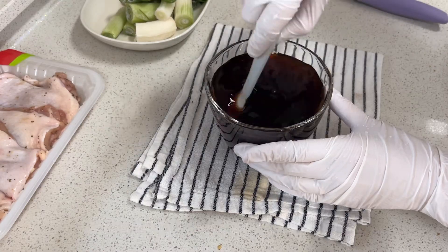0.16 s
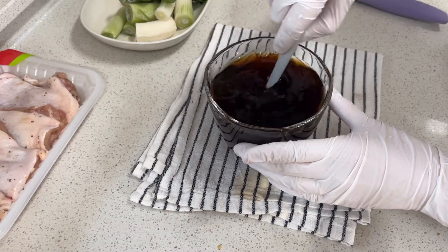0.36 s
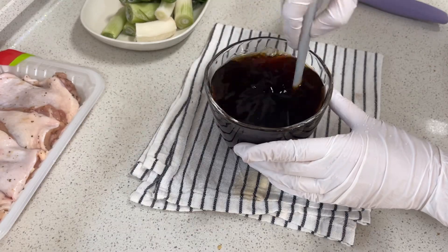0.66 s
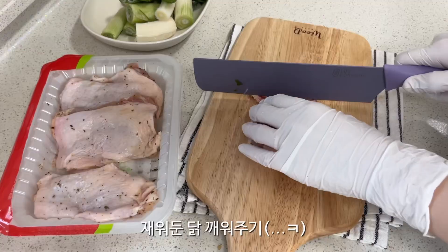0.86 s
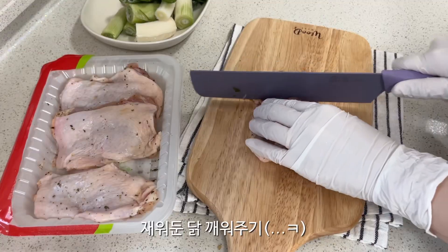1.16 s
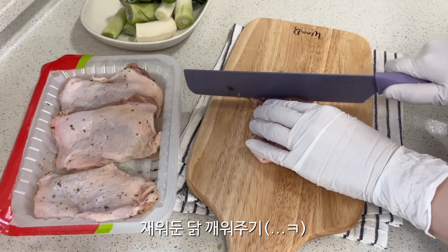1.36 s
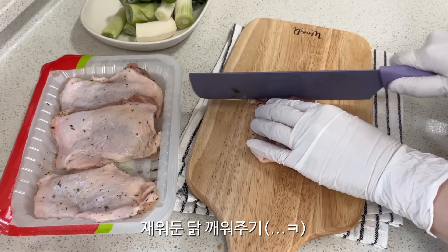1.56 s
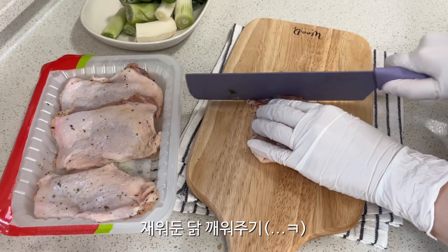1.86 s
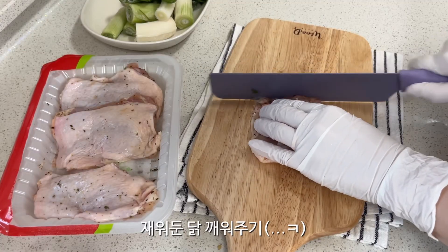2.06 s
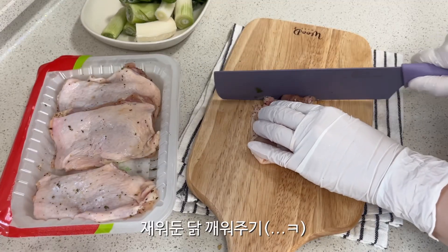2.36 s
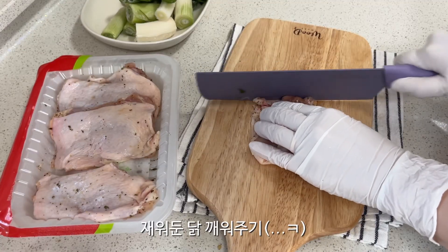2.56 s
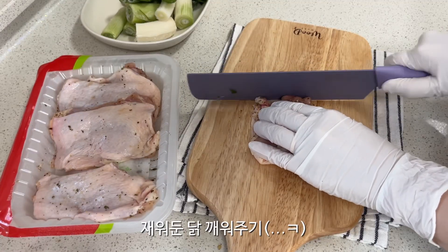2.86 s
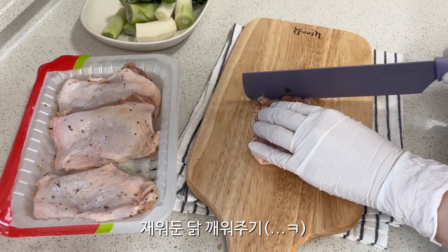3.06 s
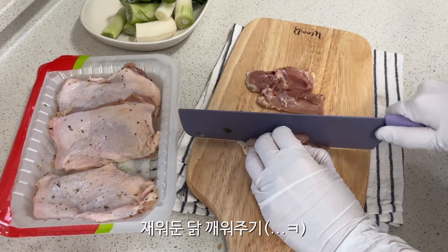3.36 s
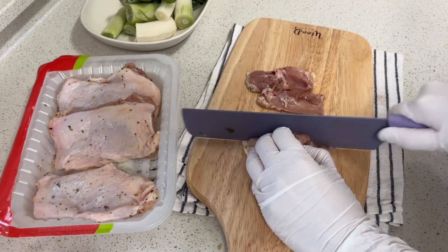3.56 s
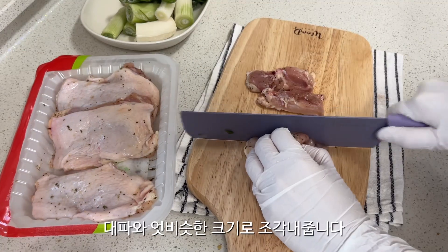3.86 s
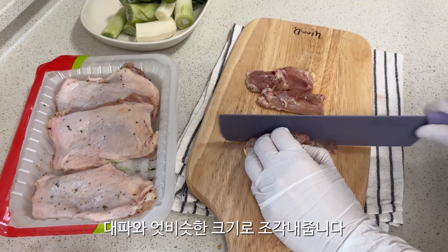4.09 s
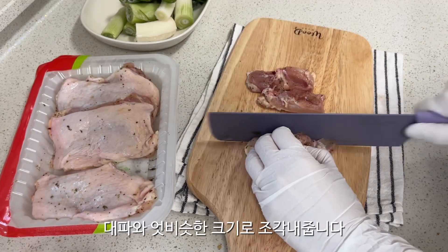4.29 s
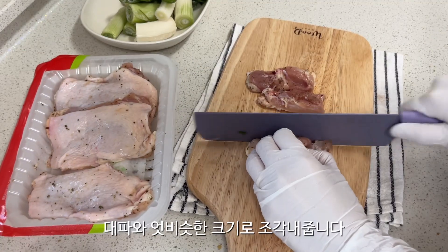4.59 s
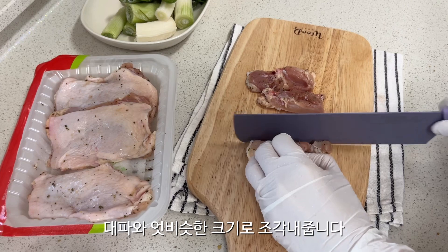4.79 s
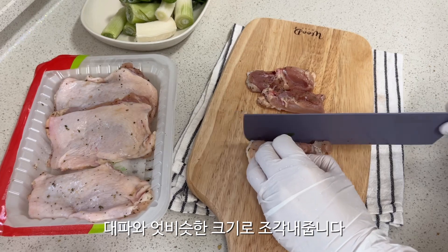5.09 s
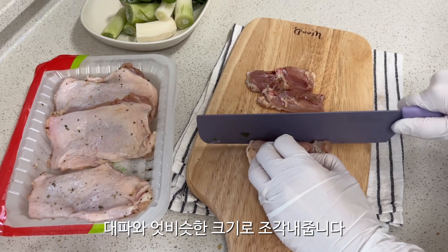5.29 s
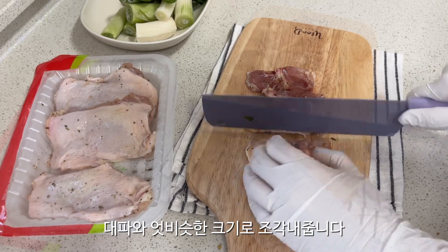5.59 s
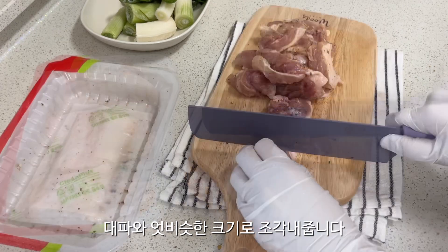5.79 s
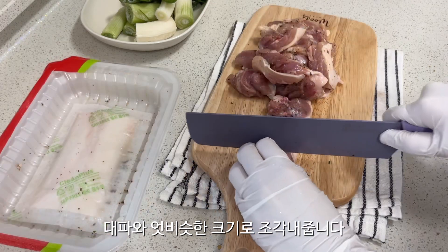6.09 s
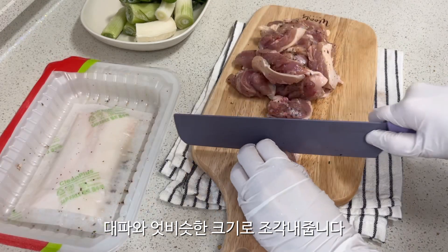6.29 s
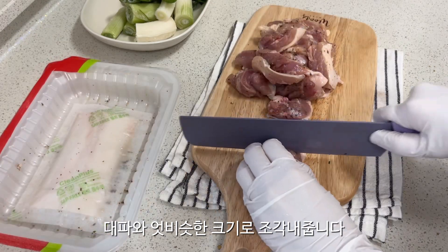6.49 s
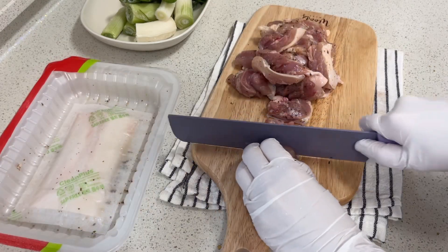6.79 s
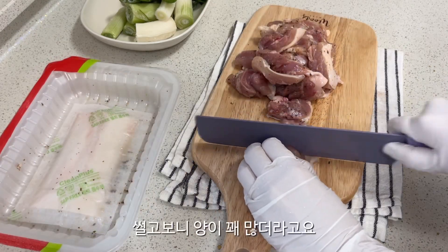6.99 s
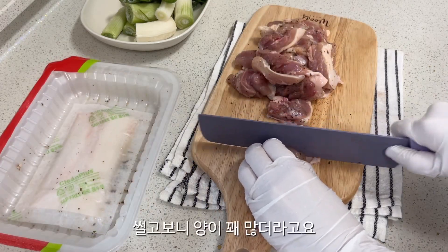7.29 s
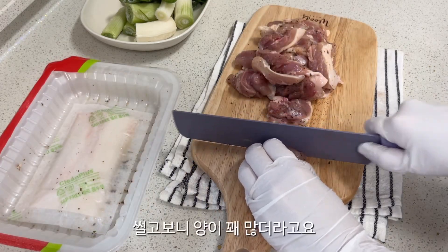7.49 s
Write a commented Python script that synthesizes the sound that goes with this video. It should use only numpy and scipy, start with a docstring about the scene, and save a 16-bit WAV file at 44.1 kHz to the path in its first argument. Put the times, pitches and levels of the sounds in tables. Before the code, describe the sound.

A spoon scrapes and clinks in a glass bowl, then a knife rasps through raw wet meat with woody knocks, over a faint appliance drone.

```python
"""An appliance drones in a small kitchen, over soft room air and a low rumble.
Close to the microphones a spoon stirs sauce in a glass bowl: grainy scraping swirls and ringing clinks.
Then a knife saws through raw meat on a wooden board. Each stroke tears countless fibres: random grains
make a rasp that swells with the blade's speed, a hiss at its edge and a grumble in the board.
Wet meat ticks and squelches in noise bursts, and the blade knocks on the ringing wood."""
import sys
import numpy as np
from scipy import signal
from scipy.fft import rfft, irfft, next_fast_len
from scipy.io import wavfile
from scipy.ndimage import uniform_filter1d, map_coordinates

SR = 44100
rng = np.random.default_rng(int(sys.argv[2]) if len(sys.argv) > 2 else 0)


def file_out(sig):
    """Save sig as 16-bit WAV at sys.argv[1]."""
    # one column per channel
    cols = np.atleast_2d(sig).T
    # limit, then scale
    lim = np.clip(cols, -1, 1)
    pcm = np.round(lim * 32767).astype(np.int16)
    wavfile.write(sys.argv[1], SR, pcm)


N = 337365
TIME = np.arange(N) / SR

# where the rasp takes on the colour of the second and the third piece of meat: time [s]
PIECE_STARTS = [3.165, 5.7]
# modes of the wooden board: (frequency [Hz], relative level [dB], t60 [s])
BOARD_MODES = [(509, 1, 0.11), (770, -9.5, 0.08), (851, -14, 0.12), (952, -23, 0.12), (1107, -24, 0.07),
               (1294, -19, 0.09), (1473, -22.5, 0.14), (1810, -18, 0.21), (1954, -20, 0.22),
               (2224, -29.5, 0.29), (3400, -41, .05)]
# colour of squeezed wet meat: (frequency [Hz], relative level [dB per Hz])
SQUISH_COLOUR = [(500, 3), (1500, -4.5), (3300, 3), (6000, -4.5), (11000, -10), (16000, -13)]


def amp(db):
    """Decibels to gain."""
    return 10 ** (np.asarray(db) / 20)


def unit(x):
    """Scale to rms 1."""
    return x / np.sqrt(np.mean(x ** 2) + 1e-20)


def along(points, hz):
    """Read (Hz, value) points on a log axis."""
    f, v = np.transpose(points)
    return np.interp(np.log(hz + 1), np.log(f + 1), v)


def level(rows):
    """Gain per sample from (s, dB) rows."""
    return amp(np.interp(TIME, *np.transpose(rows)))


def wobble(rate):
    """A smooth random curve, rate knots a second."""
    knots = rng.standard_normal(int(N * rate / SR) + 4)
    return map_coordinates(knots, [TIME * rate])


def filtered(x, response):
    """x times a complex response of frequency."""
    m = next_fast_len(N + SR // 2)
    spectrum = rfft(x, m) * response(np.fft.rfftfreq(m, 1 / SR))
    return irfft(spectrum, m)[..., :N]


def coloured(x, spectrum, size=8192):
    """Pass x through a causal filter with the given (Hz, dB) shape."""
    cepstrum = irfft(np.log(amp(along(spectrum, np.fft.rfftfreq(size, 1 / SR)))))
    # folding the cepstrum forward gives minimum phase
    cepstrum[1:size // 2] *= 2
    cepstrum[size // 2 + 1:] = 0
    impulse = irfft(np.exp(rfft(cepstrum)))
    return signal.fftconvolve(x, impulse)[:len(x)]


def add(track, s, sound):
    """Mix a sound into the track at s seconds."""
    part = track[round(s * SR):][:len(sound)]
    part += sound[:len(part)]


def fade(t60):
    """Half a second of exponential decay."""
    return np.exp(-np.log(1000) * TIME[:SR // 2] / t60)


def burst(spectrum, t60, attack):
    """A short coloured crack of noise, of peak 1; t60 and attack in seconds."""
    rise = 1 - np.exp(-TIME[:SR // 2] / attack)
    noise = rng.standard_normal(SR // 2) * rise * fade(t60)
    crack = coloured(noise, spectrum)
    return crack / np.abs(crack).max()


def ring(modes):
    """Struck modes decay as sines, at slightly new strengths for every blow."""
    t = TIME[:SR // 2]
    return sum(amp(db + rng.standard_normal()) * fade(t60) * np.sin(2 * np.pi * hz * t)
               for hz, db, t60 in modes)


def grains(rate, spread_db):
    """Random tiny impulses, rate a second, with uneven sizes; the whole has rms 1."""
    sizes = amp(spread_db * np.clip(rng.standard_normal(N), -2, 2)) * rng.choice([-1, 1], N)
    hits = rng.random(N) < rate / SR
    # denser grains are made smaller, so that their power holds steady
    return unit(sizes * hits / np.sqrt(rate))


def swell(start, length, peak_share):
    """Half a sine from rest to rest, highest peak_share of the way through."""
    peak = start + length * np.clip(peak_share, .1, .9)
    turn = np.interp(TIME, [start, peak, start + length], [0, .5, 1])
    return np.abs(np.sin(np.pi * turn))


def background(speed):
    """An appliance drones and whines over room air and a low rumble that grows as strokes rock the worktop."""
    # low rumble of worktop and room: (time [s], level [dB] before the gains below)
    rumble_level = [(0.15, -57.5), (2.42, -60.5), (3.92, -52.5), (5.84, -54), (5.92, -60.5), (7.55, -53.5)]
    # its colour: (frequency [Hz], relative level [dB per Hz])
    rumble_colour = [(18, -49), (28, -28), (40, -6), (54, 2.5), (70, -10), (100, -12.5), (160, -31),
                     (400, -54.5)]
    # soft room air: (frequency [Hz], relative level [dB per Hz])
    air_colour = [(50, -8), (100, 0), (165, -2.5), (220, -6), (330, -7.5), (500, -16), (1000, -25.5),
                  (2000, -39.5), (5000, -40.5), (10000, -41), (16000, -52)]
    # the appliance's hum and thin whine: (frequency [Hz], rms level [dB])
    drone_tones = [(54.5, -64.5), (160, -76), (14718, -88)]
    rest_db, rocking_db = -2, 3.5  # gain with the blade at rest; more at its full speed
    sway_db = 2  # the rumble rises and falls by chance

    rumble_gain = amp(rest_db + rocking_db * speed + sway_db * wobble(7)) * level(rumble_level)
    rumble = rumble_gain * unit(coloured(rng.standard_normal(N), rumble_colour))
    # each tone's phase wanders a little
    drone = sum(amp(db) * unit(np.sin(2 * np.pi * hz * TIME + 0.58 * wobble(6.9)))
                for hz, db in drone_tones)
    air = unit(coloured(rng.standard_normal(N), air_colour))
    width = unit(coloured(rng.standard_normal(N), air_colour))
    # opposite signs left and right spread the air
    return rumble + drone + amp(-65) * air + amp(-73.5) * np.array([width, -width])


def stirring():
    """The spoon grazes the glass in uneven swirls and now and then strikes it, ringing bowl and spoon."""
    # swirls round the bowl, each swelling and fading: (start [s], length [s], level [dB])
    swirls = [(0.128, 0.27, -71), (0.36, 0.2, -75.5), (.56, 0.092, -68), (0.721, 0.035, -64)]
    # the glass under the sliding spoon: (frequency [Hz], relative level [dB per Hz])
    scrape_colour = [(700, -21), (1120, 2), (1400, -8.5), (2100, 3.5), (2400, -13), (2750, -4), (3600, -13),
                     (4500, -8), (4900, 1.5), (5500, -11), (6300, -15), (7600, -4.5), (9500, -23),
                     (16000, -25)]
    # the spoon hits the bowl: (time [s], glass [dB], spoon [dB], click [dB] before its gain below)
    clinks = [(0.1388, -51.5, -59, -43), (.2, -65, -78, -62), (0.234, -68, -79, -45),
              (0.2514, -58, -47.5, -37), (0.7301, -84, -85, -49), (.739, -88, -86, -61)]
    # modes of the glass bowl: (frequency [Hz], relative level [dB], t60 [s])
    glass_modes = [(1137, -11.5, 0.17), (2070, -8, 0.075), (2770, -1.5, 0.13), (3500, 2, 0.027),
                   (5020, -12, 0.13), (7200, -31, .1)]
    # modes of the spoon: (frequency [Hz], relative level [dB], t60 [s])
    spoon_modes = [(2340, -18, 0.034), (2505, 5.5, 0.062), (2570, -7, 0.095), (3000, -17, 0.049)]
    # hard tap on glass: (frequency [Hz], relative level [dB per Hz])
    tap_colour = [(500, -24), (1200, -9.5), (2100, 0), (3200, -1), (5000, -5), (7600, -0.5), (10000, -16),
                  (16000, -14)]
    swirl_sharpness = 1.2  # above 1 narrows each swell

    graze = unit(coloured(grains(1200, spread_db=3.0), scrape_colour)) * amp(3.0 * wobble(31.0))
    bowl = graze * sum(amp(db) * swell(start, length, .5) ** swirl_sharpness
                       for start, length, db in swirls)
    for s, glass_db, spoon_db, click_db in clinks:
        add(bowl, s, amp(glass_db) * ring(glass_modes) + amp(spoon_db) * ring(spoon_modes))
        add(bowl, s, amp(click_db + 2.5) * burst(tap_colour, t60=0.0063, attack=0.00035))
    return bowl


def smacks(count, centre_hz, cycles):
    """Tiny wet pops at random times, each ringing a few cycles at its own pitch."""
    when, pitch, size = rng.random(count), rng.standard_normal(count), rng.exponential(size=count)
    turns = centre_hz * np.exp(.38 * pitch[:, None]) * TIME[:SR // 80]
    sizes = amp(2.6 * np.minimum(size, 3))[:, None]
    pops = sizes * np.sin(2 * np.pi * turns) * np.exp(-turns / cycles)
    places = (when * N).astype(int)[:, None] + np.arange(SR // 80)
    return unit(np.bincount(places.ravel(), pops.ravel(), N)[:N])


def wet_meat():
    """Moist films part under glove and blade: ticks and squelches over small smacks and a faint crackle."""
    # the fingers hold and shift the meat: (start [s], end [s], level [dB])
    handling = [(.98, 5.4, -73.5), (5.98, 9.3, -82)]
    # the meat squelches under the glove: (time [s], peak level [dB])
    squelches = [(1.0064, -48), (1.0952, -53), (1.161, -58.5), (1.3217, -55.5), (5.8022, -49),
                 (6.0202, -57.5), (6.7816, -46), (6.915, -44)]
    # wet films snap: (time [s], level [dB] before the gains below)
    ticks = [(1.425, -39), (1.661, -45), (1.936, -47), (2.218, -44.5), (3.5718, -51), (4.789, -51),
             (5.4824, -45.5), (5.5609, -46.5), (5.8475, -41.5), (5.874, -42.5), (6.0916, -50.5),
             (6.344, -51), (6.7213, -45), (6.7493, -35), (6.915, -33.5)]
    # snap of a film: (frequency [Hz], relative level [dB per Hz])
    snap_colour = [(2000, -30), (6000, -3.5), (9000, 0), (16000, 0)]
    grip_s = 0.022  # the hand takes hold and lets go
    tick_body_db = -10.5  # the soft body under a snap

    crackle = unit(coloured(grains(900, spread_db=11.0), SQUISH_COLOUR))
    clumps = amp(5.3 * wobble(22))
    grip = sum(amp(db) * np.clip(np.minimum(TIME - start, end - TIME) / grip_s, 0, 1)
               for start, end, db in handling)
    pops = smacks(count=900, centre_hz=2670, cycles=3.3)
    meat = grip * unit(clumps * (pops + 1.8 * crackle))
    for s, db in ticks:
        snap = amp(2) * burst(snap_colour, t60=.005, attack=.0001)
        body = amp(tick_body_db) * burst(SQUISH_COLOUR, t60=0.015, attack=0.00017)
        add(meat, s, amp(db) * (snap + body))
    for s, db in squelches:
        add(meat, s, amp(db) * burst(SQUISH_COLOUR, t60=0.026, attack=0.00044))
    return meat


def knocks():
    """The blade breaks through gristle and lands on the board; the hand's weight adds dull bumps."""
    # the blade meets the board: (time [s], level [dB] before the gain below, meat in between [0-1])
    landings = [(1.035, -47, 0.8), (1.535, -35.5, 0.7), (1.964, -39.5, 1), (2.15, -34, 0.95),
                (2.279, -35.5, 0), (3.094, -33.5, 0.1), (3.114, -34.5, .2), (3.135, -37.5, 0.6),
                (3.321, -38, 0.05), (3.432, -44.5, 0), (3.472, -38, 0.07), (3.588, -30.5, 0.4),
                (3.712, -29, 0.03), (3.728, -29, 0.64), (4.884, -34.5, 0.5), (4.898, -31, .2),
                (5.046, -32, 0.35), (5.379, -43.5, 0), (5.681, -17, .01), (6.733, -40.5, 1),
                (6.752, -37.5, 0), (6.821, -36, 0), (6.975, -41, 0.85), (7.076, -26.5, 0.8),
                (7.082, -23.5, .55)]
    # dull thud of steel on wood: (frequency [Hz], relative level [dB per Hz])
    thud_colour = [(100, -28), (300, -12.5), (700, 0), (1400, -6.5), (2100, -9.5), (2800, -27.5),
                   (3500, -18.5), (4900, -30), (5800, -55), (16000, -61)]
    # the hand bears down, the board shifts on its towel: (time [s], level [dB] before the gain below)
    pushes = [(1.529, -65), (1.83, -50.5), (6.737, -47.5), (6.776, -56)]
    # dull bump of the board: (frequency [Hz], relative level [dB per Hz])
    bump_colour = [(50, -2), (110, 2.5), (220, -6.5), (380, -5), (800, -22), (3000, -65)]
    ring_db, meat_damping_db = -9, 19  # ring of the bare board; what a full cushion of meat takes off it

    wood = np.zeros(N)
    for s, db, meat in landings:
        meat = np.clip(meat, 0, 1)
        thud = burst(thud_colour, t60=0.043, attack=0.00063)
        crunch = meat * burst(SQUISH_COLOUR, t60=0.018, attack=.001)
        board_ring = amp(ring_db - meat_damping_db * meat) * ring(BOARD_MODES)
        add(wood, s, amp(db - 4.5) * (thud + board_ring + crunch))
    for s, db in pushes:
        add(wood, s, amp(db + 6.5) * burst(bump_colour, t60=0.23, attack=0.0066))
    return wood


def strokes():
    """Blade speed and the gains of drag, rasp and hiss: from the run of each stroke and its force."""
    # knife strokes, to and fro: (start [s], length [s] before overlap, force [dB])
    saw_strokes = [(1.406, 0.082, -65), (1.533, 0.074, -53), (1.665, 0.099, -64), (1.816, 0.081, -58),
                   (1.943, 0.1, -59.5), (2.064, 0.18, -54.5), (2.245, 0.11, -49.5), (2.363, .15, -47),
                   (2.52, .19, -44), (2.72, 0.18, -45), (2.904, 0.17, -43), (3.081, 0.078, -44.5),
                   (3.181, 0.073, -62.5), (3.298, 0.091, -56.5), (3.42, 0.071, -60), (3.517, 0.15, -53.5),
                   (3.665, 0.13, -46), (3.798, .12, -49.5), (3.932, 0.14, -43), (4.076, 0.14, -45),
                   (4.22, 0.16, -47), (4.378, 0.18, -44), (4.524, 0.23, -46), (4.782, .17, -49.5),
                   (4.963, 0.17, -50), (5.135, 0.17, -46.5), (5.355, 0.045, -61.5), (5.733, 0.16, -68.5),
                   (6.349, 0.11, -75.5), (6.456, 0.076, -66.5), (6.583, 0.12, -70), (6.733, 0.072, -54),
                   (6.84, 0.13, -57.5), (6.972, 0.15, -49.5), (7.121, 0.15, -52), (7.281, .15, -51),
                   (7.469, 0.24, -50.5)]
    # past the thick of each piece the edge drags less, and in the second and third it hisses more:
    # (through at [s], hiss gain [dB], drag loss [dB])
    breakthroughs = [(2.3, 0, 7), (3.75, 3.5, 5), (7.1, 4.5, 5.5)]
    fastest_share = 0.51  # how far into a stroke the blade runs fastest
    roundness = 0.8  # below 1 the blade reaches its speed early and holds it
    overlap_s = .005  # the meat keeps tearing while the blade turns round
    usual_force_db = -50
    # hiss at the usual force, before the mix in sawing(); its dB per dB of force
    hiss_db, hiss_slope = -62.5, 0.58
    # the grumble follows the force up to a limit, which drops once the blade is through;
    # both also stand before that mix
    drag_over_db, drag_limit_db = 2, -53.5

    speed, drag, rasp, hiss = np.zeros((4, N))
    for start, length, force_db in saw_strokes:
        run = swell(start - overlap_s, length + 2 * overlap_s, fastest_share) ** roundness
        through_s, gain_db, loss_db = breakthroughs[np.searchsorted(PIECE_STARTS, start)]
        through = start > through_s
        drag_db = min(force_db + drag_over_db, drag_limit_db - through * loss_db)
        edge_db = hiss_db + hiss_slope * (force_db - usual_force_db) + through * gain_db
        speed += run
        drag += amp(drag_db) * run
        rasp += amp(force_db) * run ** 1.36
        hiss += amp(edge_db) * run ** 1.58
    return speed, drag, rasp, hiss


def through_board(x, share):
    """Part of a vibration reaches the air directly, part sets the board's modes ringing."""
    ringing = unit(signal.fftconvolve(x, ring(BOARD_MODES))[:N])
    return unit(x + share * ringing)


def shifting(x, depth_db):
    """Resonances come and go as the contact point travels along the blade."""
    z = signal.stft(x, nperseg=1024)[2]

    def field(size):
        """Random gains smoothed over size frequency bins and nine frames."""
        over_bins = uniform_filter1d(rng.standard_normal(z.shape), size, axis=0)
        return unit(uniform_filter1d(over_bins, size=9, axis=1))

    gain = amp(depth_db * (field(size=2) + 0.79 * field(size=12)))
    return unit(signal.istft(z * gain, nperseg=1024)[1][:N])


def sawing(speed, drag, rasp, hiss):
    """The blade speeds up and stops in each stroke; the faster it runs, the denser the tearing."""
    # rasp of the three pieces of meat, each: (frequency [Hz], relative level [dB per Hz])
    first_piece = [(530, -26.5), (900, -4), (1330, 0.5), (1690, -8), (2150, 1), (2430, -12.5), (2640, -8),
                   (2870, -15.5), (3350, 0), (3500, -0.5), (3960, -13), (4370, -4.5), (4990, -18),
                   (5460, -17), (6500, -16), (8450, -58), (14300, -120)]
    second_piece = [(530, -40.5), (900, -4.5), (930, -6), (978, -1.5), (1130, -3.5), (1300, -1.5),
                    (1480, 1.5), (1790, -9.5), (2250, 2), (3090, -11), (3470, -2.5), (3860, -9),
                    (4790, -5.5), (5600, -15), (6500, -20), (8450, -68), (14300, -120)]
    third_piece = [(530, -38), (950, -11.5), (1280, 4), (1530, 2), (1740, -5.5), (2000, 1.5), (2400, -6),
                   (2750, -7.5), (3060, -0.5), (3700, -5), (5200, -8), (6500, -33), (8450, -46),
                   (14300, -120)]
    # hiss of the edge: (frequency [Hz], relative level [dB per Hz])
    hiss_colour = [(3000, -15), (5500, -0.5), (7500, 1.5), (9000, -1.5), (10500, 0.5), (11800, 3),
                   (13200, -4), (14400, -1), (16000, -4.5)]
    # what the board gives back under the dragging blade: (frequency [Hz], relative level [dB per Hz])
    drag_colour = [(120, -24), (250, -1.5), (400, -3), (520, 2), (650, 5), (950, 1), (1200, -8.5),
                   (1700, -29), (3000, -27)]

    # the edge catches and slips on sinew many times in a stroke
    catch = wobble(70)
    fibres = grains(900 + 5000 * speed, spread_db=2.5) * amp(2.0 * catch)
    body = shifting(through_board(fibres, share=.45), depth_db=2.6)
    piece = np.searchsorted(PIECE_STARTS, TIME)
    rasps = [unit(coloured(body, meat)) for meat in (first_piece, second_piece, third_piece)]
    tearing = np.choose(piece, rasps)

    fizz = shifting(grains(3000 + 9000 * speed, spread_db=3.0) * amp(1.2 * catch), depth_db=4.5)
    edge = unit(coloured(fizz, hiss_colour))

    slips = grains(300 + 700 * speed, spread_db=2.5) * amp(2.2 * catch)
    grumble = unit(coloured(through_board(slips, share=0.073), drag_colour))
    return amp(-2.5) * drag * grumble + amp(-0.5) * rasp * tearing + amp(5.0) * hiss * edge


def worktop(x, echo_db, count):
    """Nearby tray, bowl and wall send each microphone its own weak early echoes."""
    delays = (rng.uniform(.001, .012, (2, count)) * SR).astype(int)
    return np.array([x + amp(echo_db) * sum(np.pad(x, (d, 0))[:N] for d in side) for side in delays])


def kitchen(x):
    """The room's short answer: decaying noise, different at each microphone."""
    # how fast the small kitchen falls silent: (frequency [Hz], t60 [s])
    room_decay = [(200, 0.42), (1500, 0.3), (5000, 0.097), (14000, 0.06)]
    hz, t, z = signal.stft(rng.standard_normal((2, SR // 2)), SR, nperseg=256)
    decay = np.exp(-np.log(1000) * t / along(room_decay, hz)[:, None])
    tail = signal.istft(z * decay, SR, nperseg=256)[1]
    late = np.pad(x, (round(.004 * SR), 0))  # the room answers 4 ms late
    return signal.fftconvolve(late[None], tail / np.linalg.norm(tail[0]), axes=1)[:, :N]


def scene():
    """Everything happens on the worktop, close in front of the microphones."""
    speed, drag, rasp, hiss = strokes()
    bowl = stirring()
    cuts = sawing(speed, drag, rasp, hiss) + wet_meat()
    blows = knocks()
    room = kitchen(amp(-13.0) * bowl + amp(-14) * cuts + amp(-12.0) * blows)
    near = worktop(bowl + cuts + blows, echo_db=-15.5, count=5)
    return near + room + background(speed)


def record(dry):
    """Left and right differ in phase, most in the treble; nothing is kept above the band limit."""
    # phase by which the left channel leads the right: (frequency [Hz], phase [rad])
    left_lead = [(250, 0), (600, .3), (1000, 0), (1810, -.4), (3100, .7), (4200, .7), (5200, -.1),
                 (6500, -3.1), (8200, -6), (10300, -6.7), (12400, -9.3), (13700, -9.7), (15200, -12.4)]
    top_hz = 15800
    # half of the lead goes to each side, with opposite signs
    pair = filtered(dry, lambda hz: np.exp(.5j * np.outer([1, -1], along(left_lead, hz))))
    return filtered(pair, lambda hz: hz < top_hz)


dry = scene()
out = record(dry)
file_out(out)
```